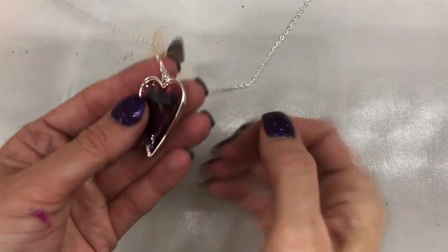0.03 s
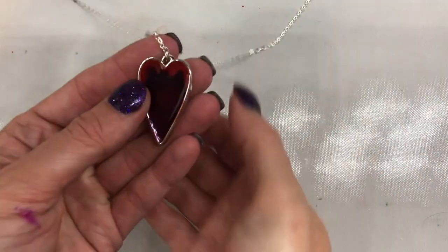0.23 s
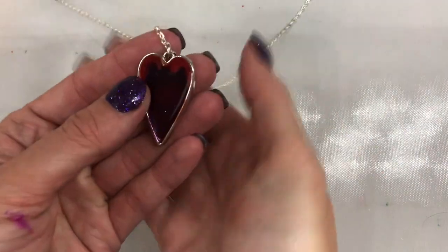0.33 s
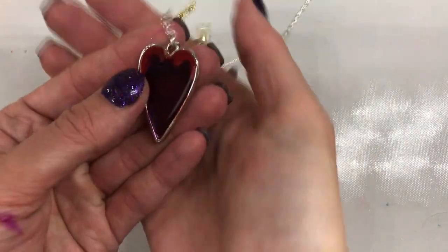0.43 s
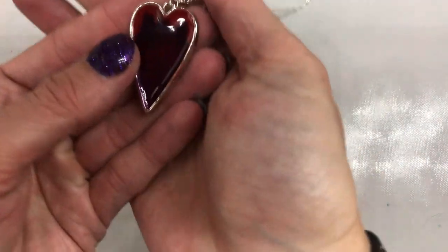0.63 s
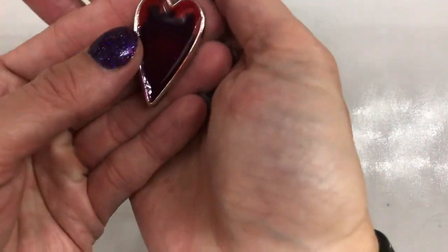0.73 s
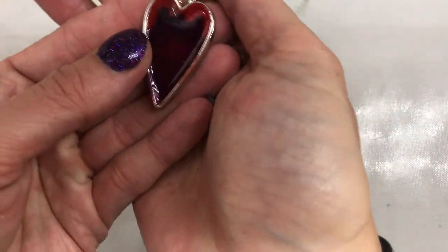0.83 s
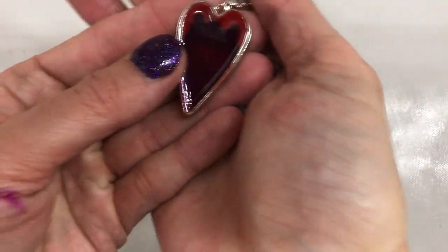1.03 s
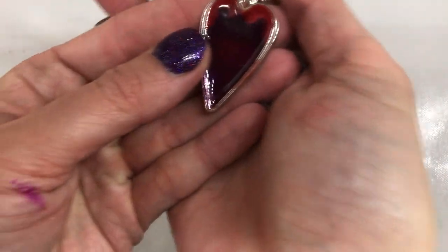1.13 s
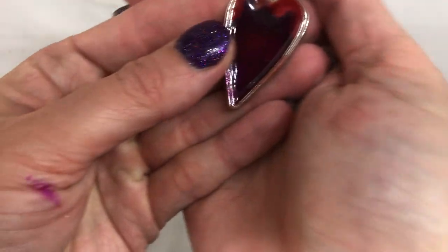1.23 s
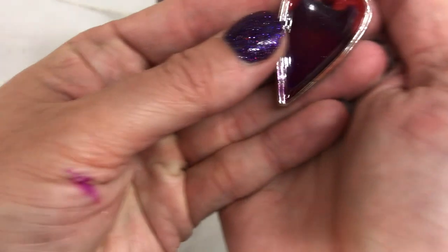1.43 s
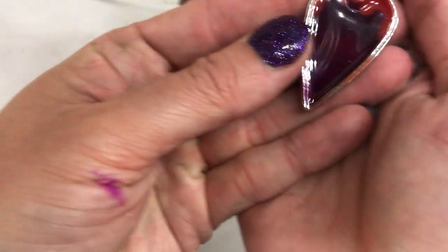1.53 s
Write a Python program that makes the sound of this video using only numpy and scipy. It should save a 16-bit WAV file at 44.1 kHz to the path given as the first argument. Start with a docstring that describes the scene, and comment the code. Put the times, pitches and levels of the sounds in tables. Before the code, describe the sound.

Close-up handling of a pendant on a fine chain: faint ticks and skin brushing, a few short glassy clinks, a tiny jingle with a dull nail knock, then mostly fingertip taps over low room noise.

```python
"""First come faint ticks of a fine chain and a soft brush of skin, over a quiet room's hiss and hum.
Then a small metal pendant, turned over in the hands close by, clinks against its ring a few times.
Each clink is a crack plus decaying tones that the fingers damp; chain links are smaller cracks and tones.
The sliding chain is a stream of random ticks, a nail knocks dully on the held pendant,
and skin rubs and taps are grainy noise shaped by the hollow of the hands. A small room adds a short tail."""
import sys
import numpy as np
from scipy import signal
from scipy.fft import rfft, irfft
from scipy.io import wavfile

SR = 44100
rng = np.random.default_rng(int(sys.argv[2]) if len(sys.argv) > 2 else 0)


def waveform_to_disk(signal):
    """Save audio, clipped to [-1, 1], as 16-bit WAV at the path in sys.argv[1]."""
    frames = np.transpose(np.atleast_2d(signal))
    scaled = np.clip(frames, -1, 1) * 32767
    samples = np.round(scaled).astype(np.int16)
    wavfile.write(sys.argv[1], SR, samples)


N = 70560

# clinks of the pendant (t/s, level/dB, finger touches after/s, touch lasts/s, finger damping/(dB/s),
# rim boost/dB, face boost/dB, stiffening by the grip/%, contact crack/dB, brightness/(dB/octave))
CLINKS = [(0.1969, -14, 0.031, .046, 401, 6, -1, 0.017, -32, -1),
          (0.2564, -28, 0.0043, .038, 504, -4, 21, 0, -40.5, 6),
          (0.2607, -24.5, 0.028, 0.044, 407, -5.5, 6, 0.042, -38, 2),
          (0.6865, -15, 0.0035, .02, 1464, 26.5, -2.5, 0.11, -33.5, 0)]
# the pendant's modes, the tones it can ring with (f/Hz)
PENDANT_HZ = [6030, 6151, 6722, 8930, 9100, 9722, 12692, 13290, 14222, 14590]
# how each mode rings (level/dB, rise/s, t60/s, share of rim boost, share of face boost,
# share of finger damping, beat with its close twin/Hz, twin's share); t60 is the time to fall 60 dB
PENDANT_MODES = [(-29, 0.00081, .05, 0, -0.014, 0.63, 0, 0), (-8, .003, 0.059, -0.29, 0, .2, 79.5, 0.33),
                 (-30.5, .0011, .33, -0.075, .8, 0.11, 14.5, 0.39),
                 (-36, 0.001103, 0.037, 1, 0.026, .8, 0, 0.0037),
                 (-27.5, 0.0012, 0.018, 0.91, -0.14, 0.51, 0, 0.039),
                 (-10, 0.0013, 0.042, 0.18, 0, 0.83, 44.5, 0.31),
                 (-7.5, 0.00112, 0.072, 0.024, 0, .94, 0, 0.14),
                 (-0.5, 0.00099, 0.15, -0.16, 0, 0.87, 7, 0.22),
                 (1.5, 0.052, 0.24, -.43, -1.1, .7, 31.5, .3),
                 (-26.5, .0011, 0.064, -0.63, 0.036, 0.608, 0, 0.055)]
# chain links knocking (t/s, strongest ring level/dB, its f/Hz, its t60/s, crack level/dB)
LINK_KNOCKS = [(.001, -48.5, 12770, 0.057, -55), (.0805, -48, 14400, 0.038, -58),
               (0.08, -48.5, 5840, 0.021, -52.5), (.17, -51, 6250, 0.016, -65),
               (0.4316, -57.5, 11700, 0.07, -56), (0.436, -56, 14650, 0.032, -56),
               (.447, -67, 11300, .02, -56), (0.4577, -48, 14600, .03, -56.5),
               (0.4644, -33.5, 14620, 0.039, -54.5), (.465, -54.5, 11440, .04, -52),
               (.49, -55, 14700, .02, -67), (0.5117, -62, 12600, .015, -53.5),
               (0.5222, -55.5, 12500, 0.017, -45.5), (0.54, -45, 13200, .08, -61.5),
               (0.5508, -40.5, 13700, 0.028, -46.5), (0.5671, -52, 14200, .02, -55),
               (.57, -42.5, 14200, .015, -47), (0.573, -45.5, 6050, 0.012, -48.5),
               (0.594, -59, 12700, 0.051, -63.5), (0.602, -35, 13250, 0.041, -48),
               (.604, -26, 14550, 0.024, -42.5), (.609, -49, 12800, 0.077, -40.5),
               (0.6287, -48, 5960, 0.041, -56), (0.6334, -52, 12450, .03, -44),
               (0.644, -42, 14600, .04, -45.5), (.645, -52.5, 4180, 0.034, -56),
               (.785, -51.5, 5860, 0.015, -58), (0.854, -57, 12670, .04, -59.5),
               (0.9495, -57, 13300, 0.053, -60), (1.048, -56, 5360, .015, -58.5),
               (1.065, -62, 14600, 0.024, -56.5), (1.4692, -52.5, 12880, .03, -65.5),
               (1.5719, -47, 12900, 0.042, -60)]
# fainter partials, extra tones at every link knock (f/Hz)
PARTIAL_HZ = [5950, 8450, 11470, 12600, 13290, 14450]
# how those partials ring (level against the crack/dB, t60/s)
PARTIALS = [(-12.5, 0.054), (-13, 0.035), (-15, .04), (-14, 0.0546), (-12, 0.039), (-15.5, 0.0511)]
# colour of a metal contact (f/Hz, level/dB)
CONTACT_COLOUR = [(500, -26.5), (2000, -20), (3800, -11.5), (5300, -9.5), (6050, -5.5), (7500, -9.5),
                  (8800, -3.5), (10500, -9), (12000, -1.5), (13300, -10.5), (14600, 3), (15600, -8.5),
                  (16500, -12.5)]
# loudness of the sliding chain over time (t/s, level/dB)
SLIDE_LEVEL = [(0, -78), (.1, -64), (.16, -71), (.4, -72), (.5, -69.5), (.57, -62), (.66, -72),
               (.76, -71.5), (1.0, -81), (1.33, -77.5), (1.439, -86), (1.6, -72)]
# a nail knocks on the held pendant and bounces (t/s, level/dB)
NAIL_KNOCKS = [(0.5187, -47), (0.5215, -46)]
# the knock's dull modes (f/Hz, level/dB, t60/s)
NAIL_MODES = [(1290, -2, 0.04), (1573, -4, 0.074), (2356, 0, 0.032), (2800, -5, 0.015), (3370, 1.5, 0.032),
              (4420, -8.5, .025), (4640, -3.5, 0.017)]
# fingers brushing (t at the peak/s, rise/s, fall/s, level/dB, centre f/Hz)
RUB_STROKES = [(.052, 0.57, 0.26, -61, 1654), (.289, 0.057, 0.16, -62.5, 1400),
               (0.518, 0.057, 0.016, -57, 1760), (0.682, 0.0078, 0.016, -58, 1720),
               (0.824, 0.053, 0.044, -61, 1490), (1.123, 0.009, 0.01, -60.5, 1500),
               (1.159, 0.098, 0.054, -65, 1700), (1.315, 0.019, 0.093, -66, 1884),
               (1.377, 0.0075, 0.028, -58.5, 2730), (1.444, 0.04, 0.055, -53, 2540)]
# fingertips and nails tapping (t/s, level/dB, centre f/Hz, rise/s, t60/s)
FINGER_TAPS = [(0.176, -45, 2450, 0.0026, 0.045), (.836, -44, 1630, .0005, 0.0077),
               (0.887, -53, 1590, 0.00031, 0.036), (1.112, -50.5, 1396, 0.00045, 0.027),
               (1.122, -51.5, 1450, 0.00063, 0.018), (1.363, -59.5, 2730, 0.00056, .034),
               (1.415, -54, 2400, 0.0035, 0.17), (1.437, -45, 3610, 0.0033, 0.039),
               (1.477, -58.5, 3260, .0005, 0.021), (1.496, -52.5, 2940, 0.00043, 0.044),
               (1.5707, -51, 3900, .0005, 0.053), (1.577, -48, 3400, 0.00089, 0.051)]
# resonances of the cupped hands and their surroundings (centre f/Hz)
HAND_HOLLOW_HZ = [600, 880, 1230, 1670, 2380, 2870, 3800, 4120, 5650, 6200]
# shape of each of those resonances (width/Hz, level/dB)
HAND_HOLLOW = [(170, 10), (85, 15), (200, 7), (220, 8.5), (300, 8), (220, 11), (180, 8), (200, 7), (280, 7),
               (344, 5)]
# colour of the room's hiss (f/Hz, level/dB per Hz)
ROOM_COLOUR = [(20, -33), (35, -10), (48, 2.5), (80, -1.5), (108, 3.5), (135, -4.5), (175, -8.5),
               (300, -12), (440, -12.5), (520, -20), (850, -19.5), (1500, -26), (4600, -31.5),
               (14400, -36.5), (16000, -41.5)]
# tones of the low hum (f/Hz, level/dB)
HUM_TONES = [(66.2, -65), (118.5, -67.5)]

CHOKE_S = 0.0013  # a new contact stops the earlier ring
TILT_PIVOT_HZ = 13290  # the brightness tilt leaves this frequency unchanged
CONTACT_RISE_S, CLINK_CRACK_T60_S, LINK_CRACK_T60_S = 0.00052, 0.036, 0.015
PARTIAL_SCATTER_DB, PARTIAL_DETUNE = 2, 0.004  # random spread of level and (as a fraction) of pitch
SLIDE_PER_S, SLIDE_SCATTER_DB, SLIDE_T60_S = 420, 2, 0.009
KNOCK_RISE_S = 0.00039
SCUFF_DB, SCUFF_T60_S, SCUFF_HZ = 1.5, 0.024, 1797
RUB_WIDTH_OCT, TAP_WIDTH_OCT, SKIN_SKIRT_DB = 0.71, 0.55, -3.5  # the skirt is the broad sound around the band
GRAIN_DB, GRAINS_PER_S = 3, 450  # depth and speed of the skin's roughness
ECHO_DB, ECHO_T60_S, ECHO_DELAY_S = -20, 0.19, 0.0031
ROOM_DB, HUM_WAVER_DB = -59, 3.5
TOP_HZ = 16000


def pendant():
    """A blow on rim or face favours different modes; twins beat, and a finger or new clink damps them."""
    out = np.zeros(N)
    for start, db, touch, lasts, damping, rim_db, face_db, stiffen, crack_db, tilt_db in CLINKS:
        age = since(start)
        out = out * np.exp(-age / CHOKE_S)
        lost_db = damping * np.clip(age - touch, 0, lasts)
        for hz, mode in zip(PENDANT_HZ, PENDANT_MODES):
            mode_db, rise, t60, rim, face, damped, beat_hz, twin = mode
            brightness_db = tilt_db * np.log2(hz / TILT_PIVOT_HZ)
            struck_db = db + mode_db + rim * rim_db + face * face_db + brightness_db
            held_hz = hz * (1 + stiffen / 100)  # the grip stiffens the metal and raises its pitch
            pair = ring(age, held_hz, rise, t60) + twin * ring(age, held_hz - beat_hz, rise, t60)
            out = out + undb(struck_db - damped * lost_db) * pair
        out = out + undb(crack_db) * contact_crack(age, CLINK_CRACK_T60_S)
    return out


def links():
    """Single links knock: a tiny crack and one high ring over further partials."""
    out = np.zeros(N)
    for start, db, hz, t60, crack_db in LINK_KNOCKS:
        age = since(start)
        knock_sound = contact_crack(age, LINK_CRACK_T60_S)
        for part_hz, (part_db, part_t60) in zip(PARTIAL_HZ, PARTIALS):
            louder, higher = rng.standard_normal(2)
            shifted_hz = part_hz * (1 + PARTIAL_DETUNE * higher)
            partial = ring(age, shifted_hz, CONTACT_RISE_S, part_t60)
            knock_sound = knock_sound + undb(part_db + PARTIAL_SCATTER_DB * louder) * partial
        strongest = ring(age, hz, CONTACT_RISE_S, t60)
        out = out + undb(db) * strongest + undb(crack_db) * knock_sound
    return out


def contact_crack(age, t60):
    """Metal touching metal gives a short burst of coloured noise."""
    return colour(rng.standard_normal(N), CONTACT_COLOUR) * fade(age, CONTACT_RISE_S, t60)


def slide():
    """The moving chain makes a faint stream of random ticks."""
    tick_starts = rng.random(N) < SLIDE_PER_S / SR
    tick_db = SLIDE_SCATTER_DB * np.clip(rng.standard_normal(N), -2, 2)
    ticks = tick_starts * undb(tick_db)
    bursts = signal.fftconvolve(ticks, fade(since(0), CONTACT_RISE_S, SLIDE_T60_S))[:N]
    level_db = np.interp(since(0), *np.array(SLIDE_LEVEL).T)
    return colour(bursts * rng.standard_normal(N), CONTACT_COLOUR) * undb(level_db)


def knock():
    """A nail strikes the gripped pendant: a scuff and a few dull modes that die quickly."""
    out = np.zeros(N)
    for start, db in NAIL_KNOCKS:
        age = since(start)
        body = sum(undb(mode_db) * ring(age, hz, KNOCK_RISE_S, t60) for hz, mode_db, t60 in NAIL_MODES)
        scuff = skin(fade(age, KNOCK_RISE_S, SCUFF_T60_S), SCUFF_HZ, TAP_WIDTH_OCT)
        out = out * np.exp(-age / CHOKE_S) + undb(db) * (body + undb(SCUFF_DB) * scuff)
    return out


def fingers():
    """Strokes of skin swell and fade; taps start suddenly and die away."""
    t = since(0)
    out = np.zeros(N)
    for peak, rise, fall, db, hz in RUB_STROKES:
        pressure = np.exp(-np.maximum((peak - t) / rise, (t - peak) / fall))
        out = out + undb(db) * skin(pressure, hz, RUB_WIDTH_OCT)
    for start, db, hz, rise, t60 in FINGER_TAPS:
        out = out + undb(db) * skin(fade(since(start), rise, t60), hz, TAP_WIDTH_OCT)
    return out


def skin(pressure, hz, octaves):
    """Grainy skin friction around a centre frequency, coloured by the hollow of the hands."""
    f = freqs()
    hollow_db = sum(db / (1 + (2 * (f - centre) / width) ** 2)
                    for centre, (width, db) in zip(HAND_HOLLOW_HZ, HAND_HOLLOW))
    band = np.exp(-0.5 * (np.log2(f / hz) / octaves) ** 2)
    skirt = undb(SKIN_SKIRT_DB) / (1 + f / (2 * hz)) * f / (f + hz / 2)
    grains = rng.standard_normal(N) * undb(GRAIN_DB * walk(rate=GRAINS_PER_S))
    return resonate(unit(grains) * pressure, (band + skirt) * undb(hollow_db))


def echo(x):
    """The short diffuse tail of a small room, made with fading noise."""
    tail = rng.standard_normal(N) * fade(since(ECHO_DELAY_S), ECHO_DELAY_S, ECHO_T60_S)
    return undb(ECHO_DB) * signal.fftconvolve(x, tail / np.linalg.norm(tail))[:N]


def room_tone():
    """Soft coloured hiss and a low hum of tones that waver in level."""
    out = undb(ROOM_DB) * colour(rng.standard_normal(N), ROOM_COLOUR)
    for hz, db in HUM_TONES:
        tone = np.sqrt(2) * np.sin(2 * np.pi * (hz * since(0) + rng.random()))  # rms 1
        out = out + undb(db + HUM_WAVER_DB * walk(rate=5.3)) * tone
    return out


def ring(age, hz, rise, t60):
    """One struck mode: a sine that rises quickly and dies away."""
    return fade(age, rise, t60) * np.sin(2 * np.pi * hz * age)


def fade(age, rise, t60):
    """Smooth rise and exponential decay, silent at age zero."""
    return (1 - np.exp(-age / rise)) * np.exp(-np.log(1000) * age / t60)


def since(start):
    """Seconds since a moment, zero before it."""
    return np.maximum(np.arange(N) / SR - start, 0)


def resonate(x, gain):
    """Ring a body that has this gain at every frequency; white noise keeps its level."""
    # the folded cepstrum gives a response that starts at once (minimum phase)
    cepstrum = irfft(np.log(gain), N)[:N // 2]
    response = irfft(np.exp(rfft(2 * cepstrum, N)), N)[:N // 20]
    return signal.fftconvolve(x, response / np.linalg.norm(response))[:N]


def colour(x, points):
    """Filter by a (f/Hz, level/dB) curve, to rms 1."""
    hz, db = np.array(points).T
    gain = undb(np.interp(np.log(freqs()), np.log(hz), db))
    return unit(irfft(rfft(x) * gain, N))


def walk(rate):
    """Smooth random wandering, mostly slower than the rate in Hz, with a spread of 1."""
    return unit(irfft(rfft(rng.standard_normal(N)) / (1 + (freqs() / rate) ** 4), N))


def freqs():
    """Frequency of every spectral bin in Hz, at least 1."""
    return np.maximum(np.arange(N // 2 + 1) * SR / N, 1)


def unit(x):
    """Scale to rms 1."""
    return x / np.sqrt(np.mean(x ** 2))


def undb(db):
    """Turn dB into a plain amplitude factor."""
    return 10 ** (np.asarray(db) / 20)


def scene():
    """Pendant, chain and hands up close, in the room."""
    near = pendant() + links() + slide() + knock() + fingers()
    return (near + echo(near) + room_tone())[None]


def record(dry):
    """The recorder steeply cuts everything above its top frequency."""
    low_pass = signal.ellip(8, 0.2, 70, TOP_HZ, fs=SR, output="sos")
    return signal.sosfilt(low_pass, dry)


dry = scene()
out = record(dry)
waveform_to_disk(out)
```